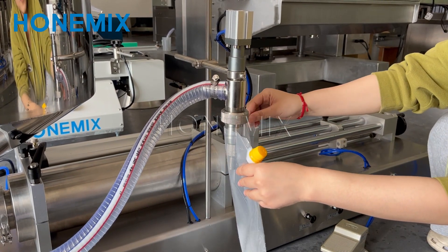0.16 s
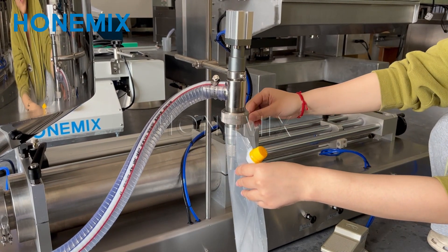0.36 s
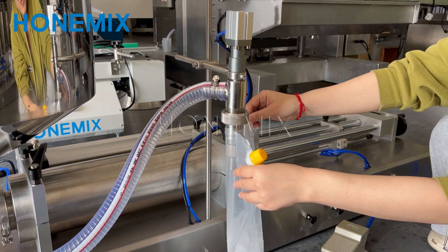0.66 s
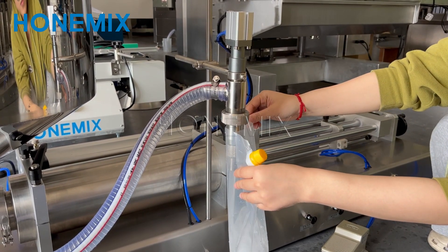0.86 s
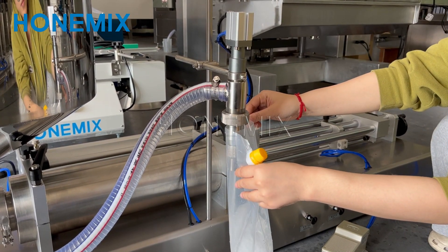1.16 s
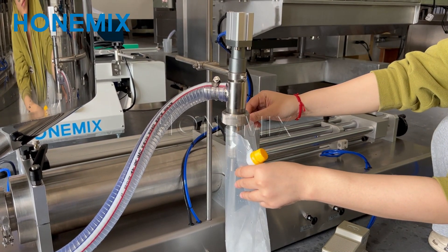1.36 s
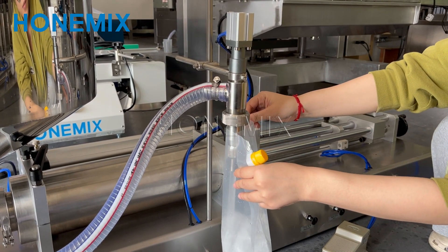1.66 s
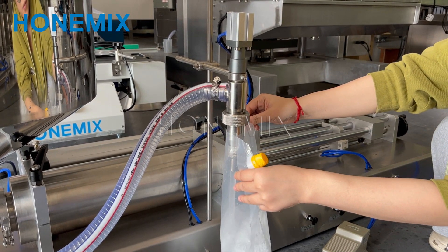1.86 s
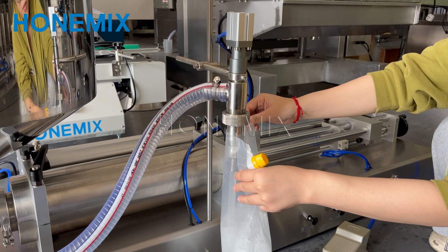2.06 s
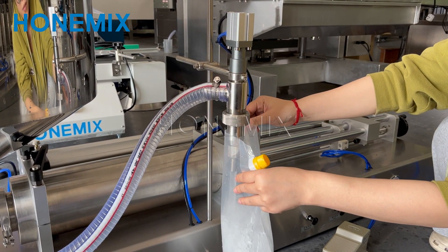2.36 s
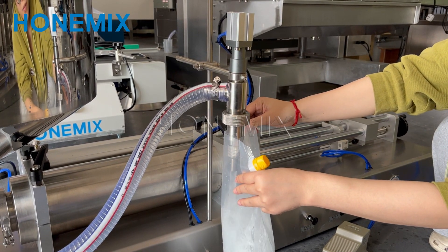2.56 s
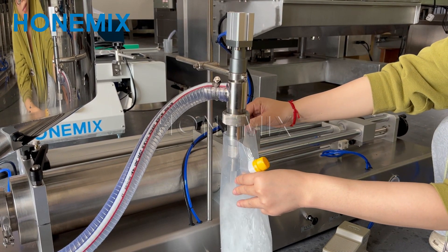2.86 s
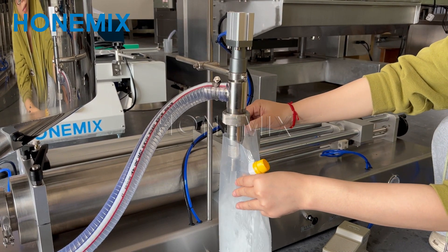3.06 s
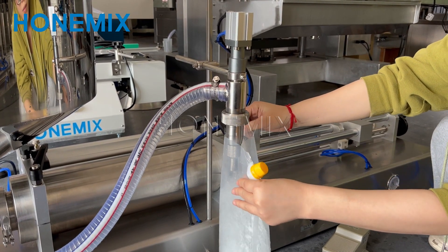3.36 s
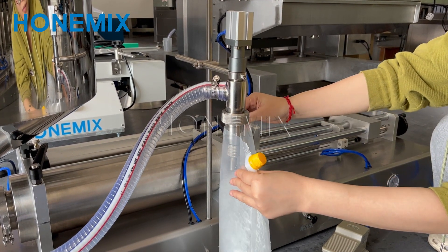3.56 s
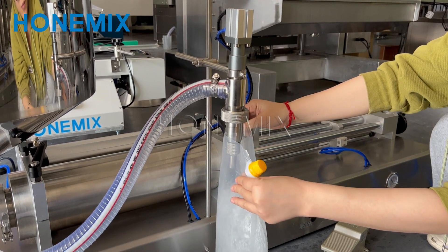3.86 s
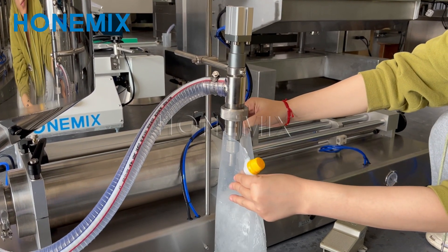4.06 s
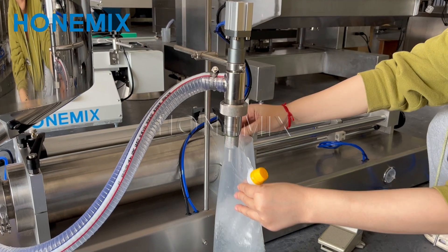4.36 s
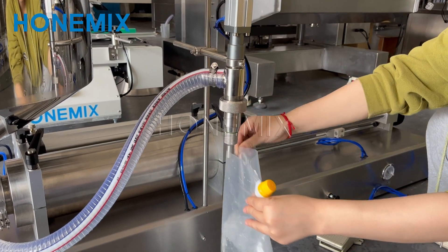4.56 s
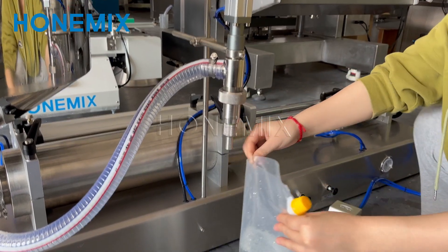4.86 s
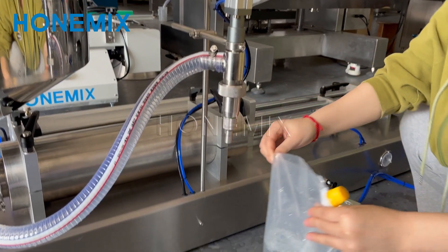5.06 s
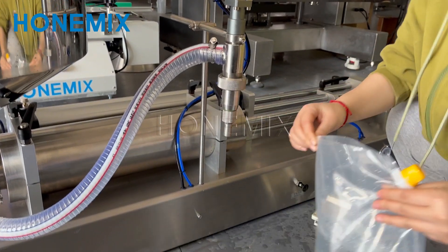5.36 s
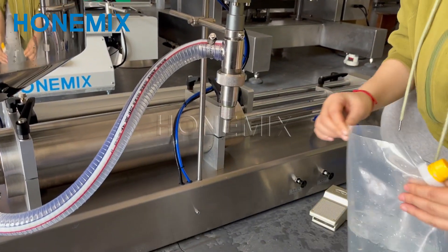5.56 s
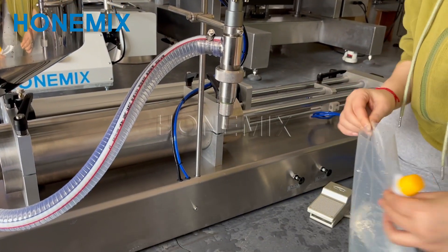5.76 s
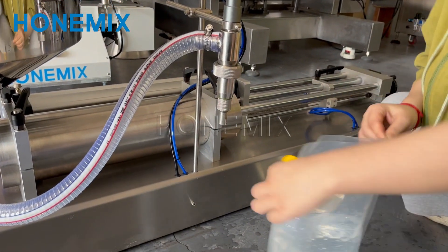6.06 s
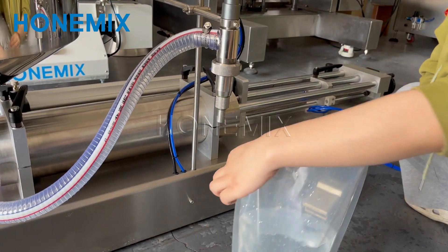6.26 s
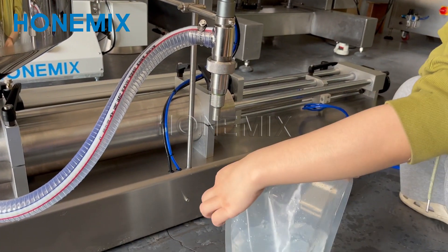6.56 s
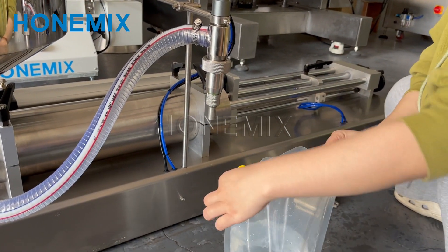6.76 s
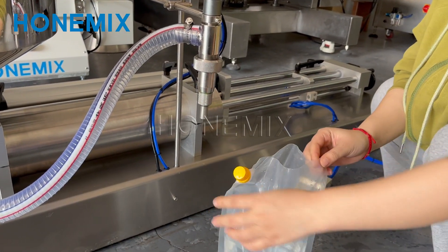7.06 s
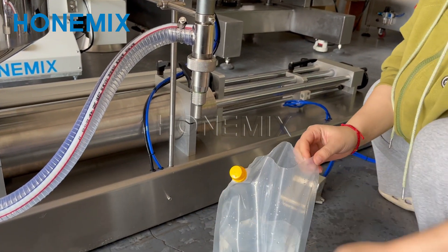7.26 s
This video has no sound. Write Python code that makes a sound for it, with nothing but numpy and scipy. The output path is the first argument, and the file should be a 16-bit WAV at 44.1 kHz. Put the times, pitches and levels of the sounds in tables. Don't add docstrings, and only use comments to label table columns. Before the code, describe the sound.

A pneumatic filler hisses and gurgles, knocks and dumps a harsh burst of air, then quiets to plastic crackles and cap taps over compressor rumble.

```python
import sys
import numpy as np
from scipy import signal
from scipy.fft import rfft, irfft, next_fast_len
from scipy.io import wavfile
from scipy.ndimage import uniform_filter1d

SR = 44100
rng = np.random.default_rng(int(sys.argv[2]) if len(sys.argv) > 2 else 0)


def bounce(signal):
    frames = np.transpose(np.atleast_2d(signal))
    limited = np.clip(frames, -1, 1)
    pcm = np.round(limited * 32767).astype(np.int16)
    wavfile.write(sys.argv[1], SR, pcm)


def attenuation_scalar(level_db):
    decades = np.asarray(level_db, float) / 20
    return 10 ** decades


N = 326472
SIZE = next_fast_len(N + SR)
FREQ = np.arange(SIZE // 2 + 1) * SR / SIZE + 1e-3
TIME = np.arange(N) / SR

# frequency in Hz, level in dB per Hz.
RUMBLE_COLOUR = [(13, -45), (22, -26), (33, -16.5), (54, -0.5), (75, -6.5), (103, -4.5), (112, -8),
                 (125, -10), (183, -7.5), (200, -18), (217, -14.5), (288, -20), (330, -22), (430, -50),
                 (730, -120)]
# frequency in Hz, level in dB per Hz.
HISS_COLOUR = [(300, -62.5), (450, -75.5), (700, -79.0), (1100, -87), (1700, -89.5), (2300, -96.5),
               (3200, -99.1), (4200, -99.7), (6000, -105.0), (8000, -107.2), (11000, -109.7),
               (14300, -114.7)]
# frequency in Hz, width in Hz, level in dB.
HUM_LINES = [(95.96, 7.4, -38.5), (192.2, 6.8, -48), (287.3, 11, -51.5), (1762, 50, -64.5)]
# opens in s, shuts in s, level in dB, sag in dB per s.
THROTTLE = [
    (-.1, 3.28, -29, 0.19),
    (3.95, 4.24, -39, -6.5),
    (4.25, 4.9, -52, 12),
    (4.9, 5.3, -64, 7),
]
# frequency in Hz, level in dB per Hz.
FLOW_COLOUR = [(200, -105), (350, -73), (600, -66.5), (1000, -65.5), (1500, -67), (2200, -71.5),
               (3000, -67), (4000, -69.5), (5200, -72), (6500, -66), (8000, -71), (10000, -70.5),
               (11500, -72.5), (14000, -72.5)]
# frequency in Hz, width in Hz, level in dB.
FLOW_PIPES = [(1552, 18, -5), (1716, 20, -3), (1834, 18, -4), (1964, 18, -4), (2098, 50, -4),
              (2260, 16, -4), (2293, 16, -4), (2450, 25, -9), (2664, 25, -5), (3061, 28, -5),
              (3500, 60, -9), (3685, 70, -3), (3830, 60, -5), (4140, 30, -6), (4193, 35, -1),
              (4400, 25, -8), (4830, 130, -6), (5022, 70, -3), (5187, 110, -3), (5740, 80, -6),
              (6150, 30, -9), (6740, 40, -7), (6960, 50, -10), (7190, 60, -7), (7410, 45, -8)]
# frequency in Hz, width in Hz, level in dB.
FLOW_TOPS = [(11280, 330, -10.5), (13400, 150, -19)]
# centre in s, extra level in dB, half width in s.
SURGES = [
    (1.694, 4.5, 0.086),
    (2.8, 5.497, 0.14),
]
# opens in s, shuts in s, level in dB, sag in dB per s, release t60 in s.
PUFFS = [
    (3.275, 3.943, -14.5, -2.5, 0.095),
    (4.235, 4.26, -28, 87, 0.18),
]
# frequency in Hz, level in dB per Hz.
DUMP_COLOUR = [(150, -61), (350, -68), (570, -64), (1000, -67.5), (1600, -57.5), (2300, -61), (3000, -59),
               (4000, -52), (5100, -57), (6800, -54.5), (8500, -51), (10000, -53.5), (11800, -62.5),
               (14300, -55.5), (15300, -54.5)]
# frequency in Hz, width in Hz, level in dB.
DUMP_PIPES = [(590, 45, -9), (840, 30, -11), (1570, 30, -5), (1770, 50, -4), (2030, 40, -4), (2600, 30, -8),
              (3065, 50, -3), (3350, 30, -6), (3682, 40, 1), (4139, 35, 0), (4740, 60, -2), (4860, 50, 0),
              (5030, 70, 0), (5170, 90, 2), (5412, 60, -1), (5570, 40, -2), (5810, 50, -5), (6230, 76, -4),
              (6555, 40, -4), (7330, 88, -5)]
# start in s, peak in dB, ring in Hz, t60 in s.
KNOCKS = [(3.2842, 10.5, 138, .047), (3.278, -12, 580, .035), (3.3015, 2, 150, .035), (3.33, -6, 720, .045),
          (3.333, -13, 850, .04), (3.34, -12, 470, .06), (3.342, -3, 190, .07), (3.36, -5, 150, .07),
          (3.372, -4, 170, .09), (3.33, -20, 105, .6), (3.4, -26, 150, .6), (4.238, -21, 560, .05),
          (4.262, -21, 640, .06), (4.243, -5, 150, .06), (4.259, -16, 170, .07), (4.275, -9, 140, .09),
          (4.245, -12, 280, .06), (4.268, -14, 340, .07), (4.29, -17, 230, .1), (4.31, -22, 300, .1)]
# start in s, peak in dB, ring in Hz, t60 in s.
POUCH_NOTES = [(4.869, -33, 930, 0.03), (4.87, -36, 1630, .06), (5.9635, -23.5, 1104, 0.046),
               (6.1596, -22.5, 980, 0.031), (6.495, -31.5, 1916, 0.037), (7.355, -27, 533, 0.041),
               (7.36, -36, 1690, 0.044)]
# start in s, peak in dB, centre in Hz, edge in dB, ring in dB.
TAPS = [(4.24, -12.5, 4970, -2, -30), (4.859, -23, 3800, -20, -30), (4.869, -19.5, 3800, -22, -28),
        (5.0, -52, 6000, 2, -40), (5.9641, -7.5, 2430, -33, -5.5), (6.1615, -21, 2060, -49, -10),
        (6.3886, -23, 2700, -26, -11), (6.395, -34, 1790, -25, -28), (6.6086, -40, 2780, -12, -25.5),
        (6.9075, -34, 8000, 5, -40), (6.986, -38, 4000, -7, -40), (6.995, -47, 4000, -8, -40),
        (7.08, -37.5, 3400, -18, -33), (7.219, -27.5, 2960, -19, -33), (7.234, -22, 3200, -9, -32),
        (7.3476, -23, 2500, -13, -20)]
# frequency in Hz, level in dB, t60 in s.
TAP_MODES = [(736, 4.5, 0.043), (1780, -2, 0.043), (2020, 1, 0.024), (3200, -3, 0.015), (4000, -11, 0.019),
             (4800, -37, 0.056), (5400, -32, 0.12)]
# frequency in Hz, width in Hz, level in dB.
SEEP_TONES = [(4000, 400, -60.5), (6000, 40, -77), (11900, 250, -75)]
# start in s, end in s, level in dB, brightness in dB.
RUSTLE = [
    [(4.685, 4.74, -46.5, -17), (4.74, 4.9, -49.5, -10)],
    [(6.388, 6.396, -31.5, -23), (6.4, 6.42, -39.5, -21.5), (6.428, 6.455, -43, -12),
     (6.472, 6.502, -42, -12)],
    [(7.35, 7.365, -38, -6), (7.382, 7.41, -43.5, -5.5)],
]
# centre in Hz, width in octaves.
RUSTLE_BODY = [(1200, 0.74), (1300, 0.96), (1800, 0.92)]
# frequency in Hz, width in Hz, level in dB.
WHINE_PARTIALS = [(2358, 40, -8), (2845, 40, 2), (2960, 30, -4), (3375, 80, -12), (3483, 38, -15),
                  (3838, 60, -13), (3984, 30, -18)]
# start in s, end in s, frequency in Hz, level in dB.
SQUEAKS = [(5.97, 6.09, 15050, -66), (6.2, 6.37, 6880, -72), (6.28, 6.52, 15550, -60)]
# frequency in Hz, t60 in s.
ROOM_T60 = [(100, 1), (300, 0.33), (1000, 1.14), (4000, 0.73), (7000, 0.19), (10000, 0.33), (15000, 0.28)]
# frequency in Hz, likeness 0-1, left minus right in dB, right lead in rad.
PORTS = [(60, .993, .5, 0), (130, .96, .6, 0), (300, .84, 1.3, 0), (650, .5, 1.2, 0), (1400, .4, -.5, 0),
         (1600, .3, -1, 0), (1750, .95, 0, -.1), (2500, .78, 2, -.6), (3600, .72, 3.5, -.9),
         (5000, .72, 4, -.2), (6500, .75, 2, 1.2), (7900, .9, 0, 2.8), (8800, .88, 0, 3.5),
         (11200, .88, 0, 5.8), (12800, .9, 0, 6.7), (14700, .86, 0, 8.9), (15700, .9, 0, 9.6)]


def unit(x):
    return x / np.sqrt(np.mean(x ** 2))


def shape(x, gain):
    return irfft(rfft(x, SIZE) * gain, SIZE)[..., :N]


def over_hz(table):
    hz, value = np.array(table)[:, 0], np.array(table)[:, 1]
    return np.interp(np.log(FREQ), np.log(hz), value)


def peaks(modes):
    power = sum(attenuation_scalar(2 * db) / (1 + (2 * (FREQ - hz) / width_hz) ** 2) for hz, width_hz, db in modes)
    return np.sqrt(power)


def band(centre_hz, octaves, freq=FREQ):
    return np.exp(-.5 * (np.log2(freq / centre_hz) / octaves) ** 2)


def noise():
    return rng.standard_normal((2, N))


def walk(rate_hz):
    k = int(SR / rate_hz)
    held = np.repeat(rng.standard_normal(N // k + 1), k)
    return 1.07 * uniform_filter1d(uniform_filter1d(held, k), k)[:N]


def decay(t, t60_s):
    return np.exp(-np.log(1000) * t / t60_s)


def ring(hz, t60_s):
    t = np.arange(SR // 2) / SR
    return np.sin(2 * np.pi * hz * t) * decay(t, t60_s)


def add(out, start_s, x):
    i = int(start_s * SR)
    out[..., i:i + x.shape[-1]] += x[..., :N - i]


def gate(start_s, end_s, attack_s, release_s, sag_db_s=0):
    held_s = np.clip(TIME - start_s, 0, end_s - start_s)
    after_s = np.maximum(TIME - end_s, 0)
    attack = np.clip((TIME - start_s) / attack_s, 0, 1)
    return attack * attenuation_scalar(-sag_db_s * held_s - 60 * after_s / release_s)


def lines(modes, flicker_db, rate_hz):
    out = 0
    for hz, width_hz, db in modes:
        tone = unit(shape(noise(), peaks([(hz, width_hz, 0)]) ** 2))
        out = out + attenuation_scalar(db + flicker_db * walk(rate_hz)) * tone
    return out


def jet(colour, pipes, pipes_db, flutter_db):
    broad = attenuation_scalar(over_hz(colour) - np.array(colour)[1:, 1].max())
    turbulence = noise() * attenuation_scalar(flutter_db * walk(24.87))
    return unit(shape(turbulence, np.hypot(broad, attenuation_scalar(pipes_db) * peaks(pipes))))


def hall():
    rumble_gain = attenuation_scalar(over_hz(RUMBLE_COLOUR)) / (1 + (FREQ / 330) ** 6)
    rumble = unit(shape(noise() * attenuation_scalar(1.1 * walk(5.09)), rumble_gain))
    hiss_gain = attenuation_scalar(over_hz(HISS_COLOUR)) * np.sqrt(SR / 2) / (1 + (300 / FREQ) ** 6)
    hiss = shape(noise() * attenuation_scalar(0.63 * walk(7.9)), hiss_gain)
    return attenuation_scalar(-33) * rumble + hiss + lines(HUM_LINES, 0.92, 5.6)


def throttle_hiss():
    attack_s, release_s = 0.021, 0.16
    flow = sum(attenuation_scalar(db) * gate(a, b, attack_s, release_s, sag) for a, b, db, sag in THROTTLE)
    return flow * jet(FLOW_COLOUR, FLOW_PIPES + FLOW_TOPS, pipes_db=10.5, flutter_db=0.5)


def gurgle():
    fill_s, end_s, release_s = 1.53, 3.1, 3.3
    surge_db = sum(db * np.exp(-((TIME - s) / half_s) ** 2) for s, db, half_s in SURGES)
    swell = attenuation_scalar(-40 + surge_db) * gate(0, end_s, fill_s, release_s)
    return swell * unit(shape(noise() * attenuation_scalar(3.5 * walk(12)), band(286, 0.6)))


def dump():
    spit_s, build_s, spit_share = 0.0073, 0.049, 0.73
    edge_db, edge_sag_db_s = 3, 8
    chest_db, chest_sag_db_s = 9, 25.5
    emptying_db_s2 = 9
    air = jet(DUMP_COLOUR, DUMP_PIPES, pipes_db=4.4, flutter_db=1.0)
    edge = shape(air, 1 / (1 + (7000 / FREQ) ** 8))
    chest = shape(air, 1 / (1 + (FREQ / 1100) ** 6))
    out = 0
    for a, b, db, sag, release_s in PUFFS:
        age_s = np.maximum(TIME - a, 0)
        spit = spit_share * gate(a, b, spit_s, release_s, sag)
        build = (1 - spit_share) * gate(a, b, build_s, release_s, sag)
        tone = air - edge - chest
        tone = tone + attenuation_scalar(edge_db - edge_sag_db_s * age_s) * edge
        tone = tone + attenuation_scalar(chest_db - chest_sag_db_s * age_s) * chest
        level = attenuation_scalar(db - emptying_db_s2 * np.minimum(age_s, b - a) ** 2)
        out = out + level * (spit + build) * tone
    return out


def blows(table, push_turns):
    out = np.zeros((2, N))
    for s, db, hz, t60_s in table:
        swing = (1 - np.exp(-TIME[:SR // 2] * hz / push_turns)) ** 2
        add(out[0], s, attenuation_scalar(db) * swing * (ring(hz, t60_s) + .2 * ring(1.37 * hz, t60_s)))
    return out


def knocks():
    return blows(KNOCKS, push_turns=.8)


def taps():
    rise_s, crack_t60_s = .0006, 0.02
    n = SR // 8
    t = TIME[:n]
    f = np.fft.rfftfreq(n, 1 / SR) + 1
    rise = 1 - np.exp(-t / rise_s)
    out = np.zeros((2, N))
    for s, db, hz, edge_db, ring_db in TAPS:
        gain = band(hz, .9, f) + attenuation_scalar(edge_db) * band(8500, .6, f)
        crack = unit(irfft(rfft(rng.standard_normal((2, n))) * gain, n))
        add(out, s, attenuation_scalar(db - 11.5) * crack * rise * decay(t, crack_t60_s))
        stretch = (hz / 2500) ** .4
        modes = sum(attenuation_scalar(g) * ring(m * stretch, t60_s)[:n] for m, g, t60_s in TAP_MODES)
        add(out[0], s, attenuation_scalar(db + ring_db - 10) * rise * modes)
    return out


def seep():
    start_s, end_s = THROTTLE[2][0], THROTTLE[3][1]
    return gate(start_s, end_s, .1, .5, sag_db_s=6) * lines(SEEP_TONES, 1.3, 6)


def rustle():
    attack_s, release_s = .013, 0.046
    grains = noise() * attenuation_scalar(4 * walk(400))
    edge = unit(shape(grains, band(7600, 0.58)))
    out = 0
    for (hz, octaves), squeezes in zip(RUSTLE_BODY, RUSTLE):
        body = unit(shape(grains, band(hz, octaves)))
        for a, b, db, bright_db in squeezes:
            out = out + attenuation_scalar(db) * gate(a, b, attack_s, release_s) * (body + attenuation_scalar(bright_db) * edge)
    return out


def pouch_notes():
    return blows(POUCH_NOTES, push_turns=0.039)


def whine():
    start_s, let_go_s, coast_end_s = 5.38, 5.76, 6.36
    drive = attenuation_scalar(-61) * gate(start_s, let_go_s, 0.068, 0.88, sag_db_s=-13)
    coast = attenuation_scalar(-71) * gate(let_go_s, coast_end_s, 0.087, .5)
    return (drive + coast) * lines(WHINE_PARTIALS, 1.2, 30)


def squeaks():
    out = np.zeros((2, N))
    for start_s, end_s, hz, db in SQUEAKS:
        n = int((end_s - start_s) * SR)
        level = attenuation_scalar(db + 3 * walk(40)[:n]) * np.hanning(n) ** .5
        add(out, start_s, level * np.sin(2 * np.pi * hz * TIME[:n]))
    return out


def room(x, near_db, far_db):
    t = TIME[:SR]
    table_hz, table_t60_s = np.transpose(ROOM_T60)
    tail = np.zeros((2, SR))
    for hz in 60 * 2. ** np.arange(9):
        t60_s = np.interp(np.log(hz), np.log(table_hz), table_t60_s)
        tail += shape(noise(), band(hz, 0.67))[:, :SR] * decay(t, t60_s)
    tail *= 1 - np.exp(-t / 0.0024)
    sparse = rng.random(SR) < .02
    close = rng.standard_normal((2, SR)) * np.exp(-t / 0.011) * sparse
    echo = attenuation_scalar(near_db) * unit(close) + attenuation_scalar(far_db) * unit(tail)
    return x + shape(x, rfft(echo, SIZE) / np.sqrt(SR))


def ports(x):
    hz, like, left_db, lead_rad = np.transpose(PORTS)
    like = np.clip(np.interp(np.log(FREQ), np.log(hz), like), 0, 1)
    tilt = attenuation_scalar(np.interp(np.log(FREQ), np.log(hz), left_db) / 2)
    turn = np.exp(1j * np.interp(FREQ, hz, lead_rad))
    left = shape(x[0], tilt)
    right = shape(x[0], like * turn / tilt) + shape(x[1], np.sqrt(1 - like ** 2) / tilt)
    return np.array([left, right])


def scene():
    machine = room(throttle_hiss() + gurgle() + dump() + knocks(), near_db=-13, far_db=-7)
    pouch = room(taps() + rustle() + pouch_notes() + squeaks(), near_db=-15.0, far_db=-16.5)
    return ports(attenuation_scalar(-1.16) * machine + pouch + hall() + seep() + whine())


def roll_off(x):
    return signal.sosfilt(signal.butter(12, 15770, fs=SR, output="sos"), x)


def record(dry):
    knee, headroom = .6, .3
    held = np.clip(dry, -knee, knee)
    held = held + headroom * np.tanh((dry - held) / headroom)
    mix = shape(held, 1 / (1 + (FREQ / 15750) ** 200))
    return roll_off(mix)


dry = scene()
out = record(dry)
bounce(out)
```